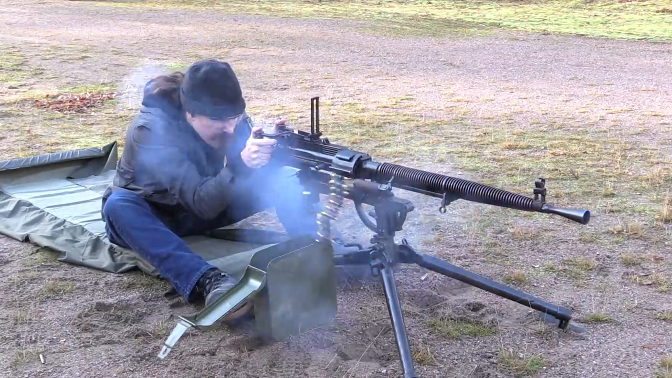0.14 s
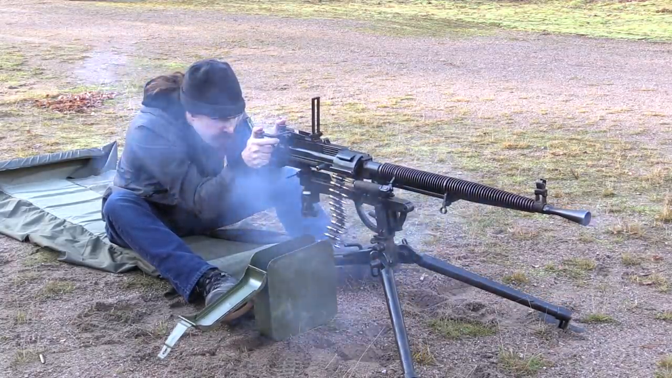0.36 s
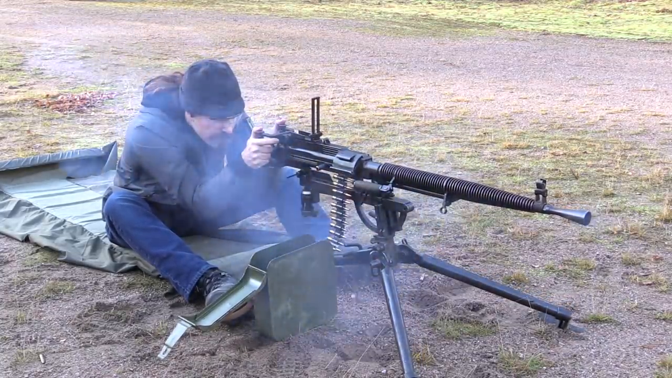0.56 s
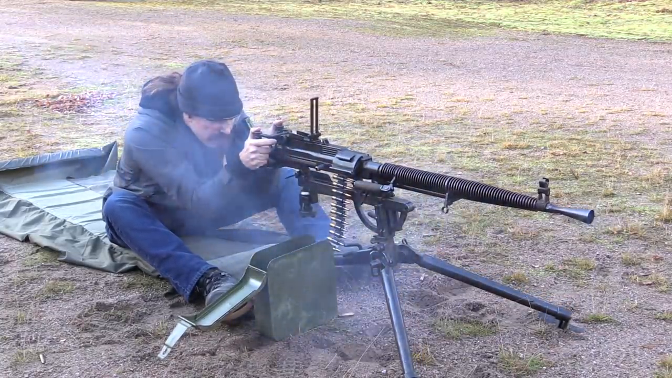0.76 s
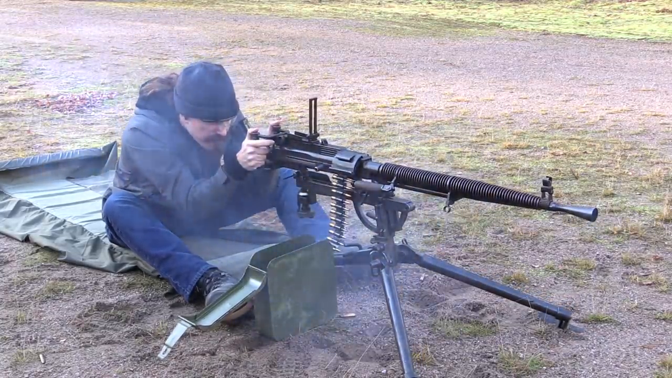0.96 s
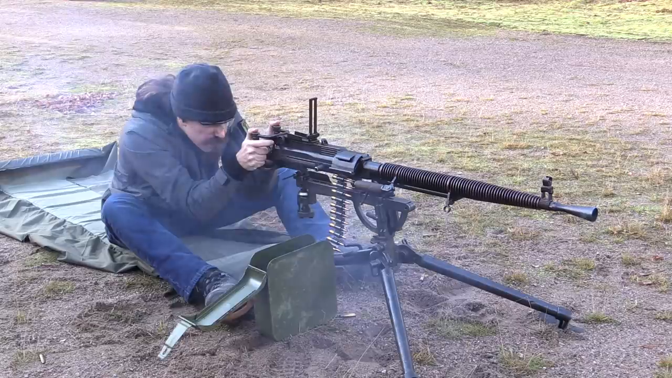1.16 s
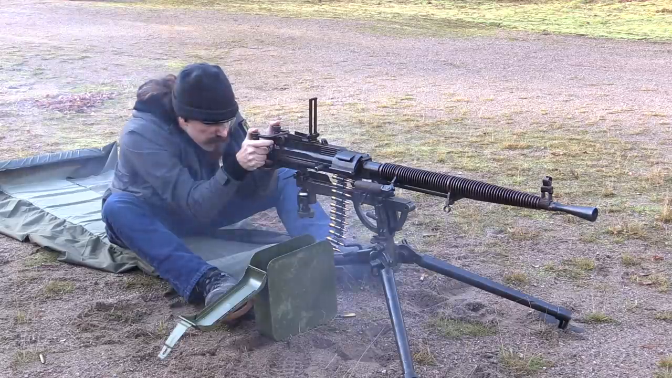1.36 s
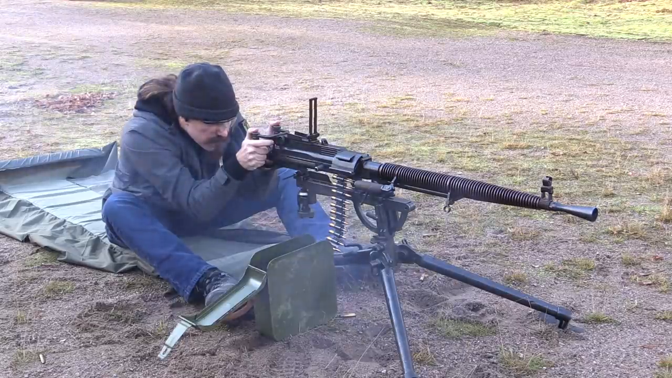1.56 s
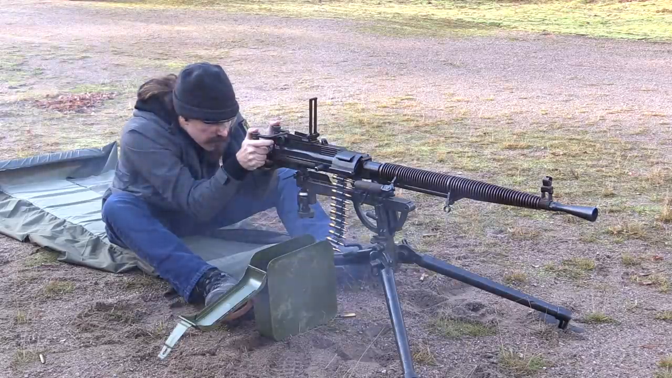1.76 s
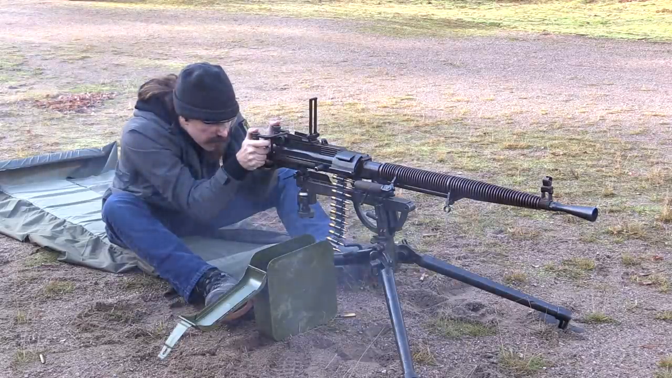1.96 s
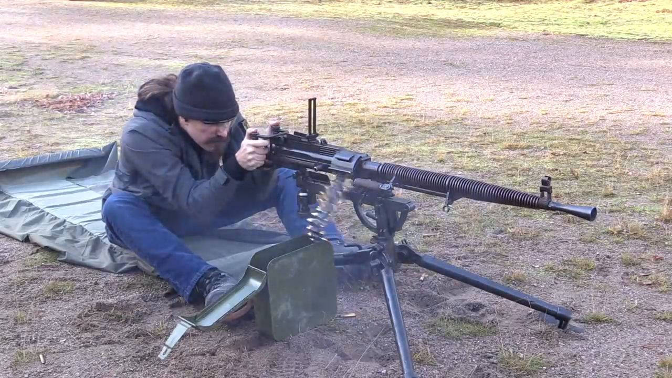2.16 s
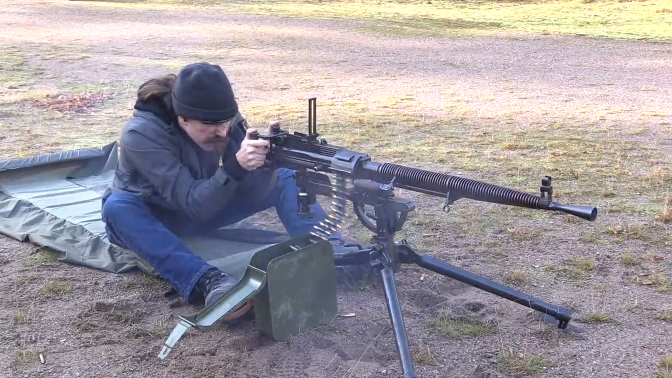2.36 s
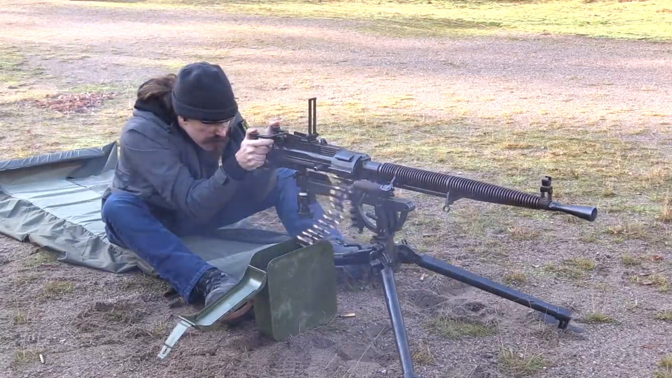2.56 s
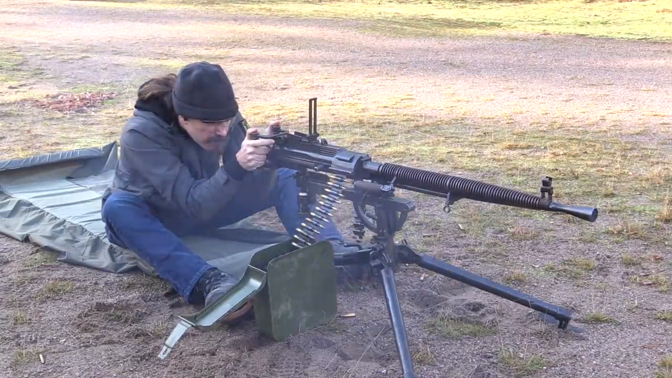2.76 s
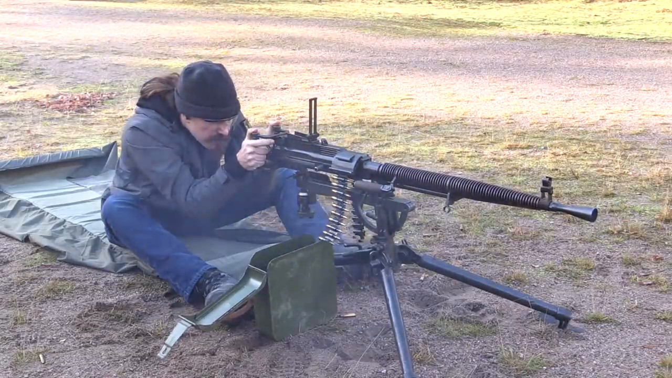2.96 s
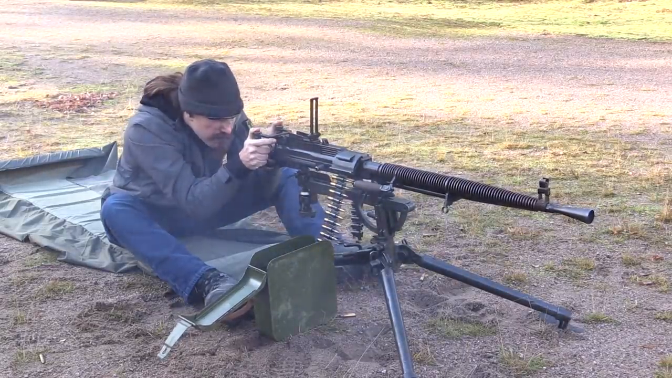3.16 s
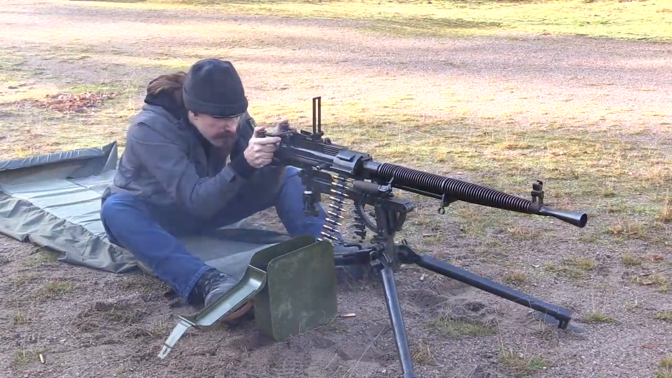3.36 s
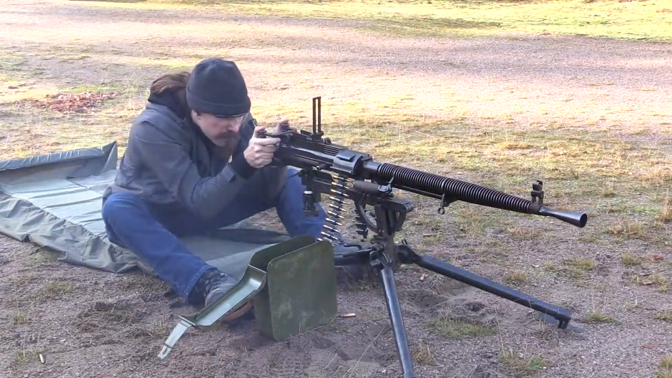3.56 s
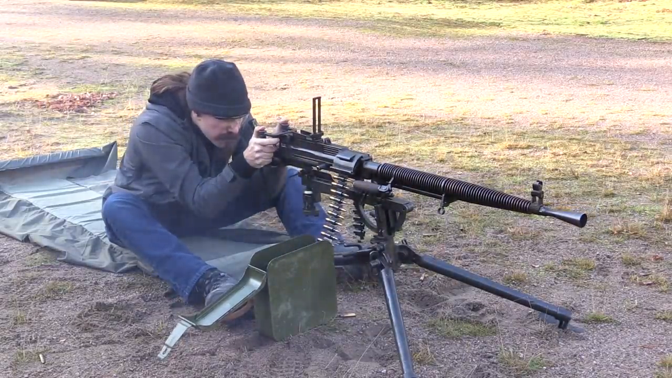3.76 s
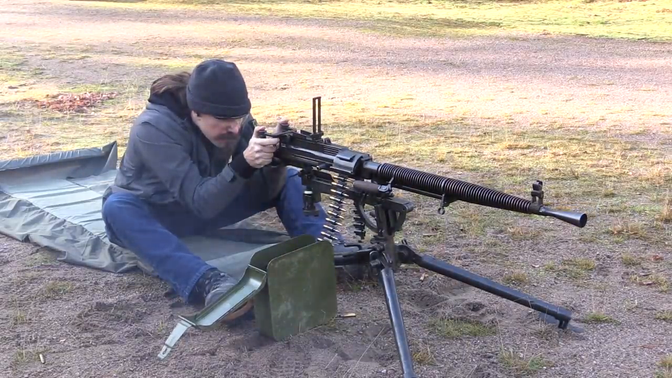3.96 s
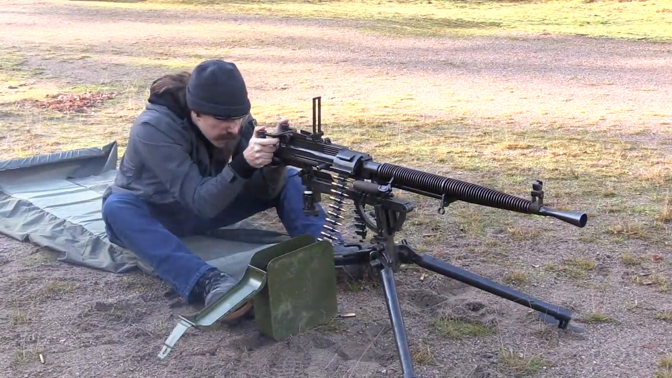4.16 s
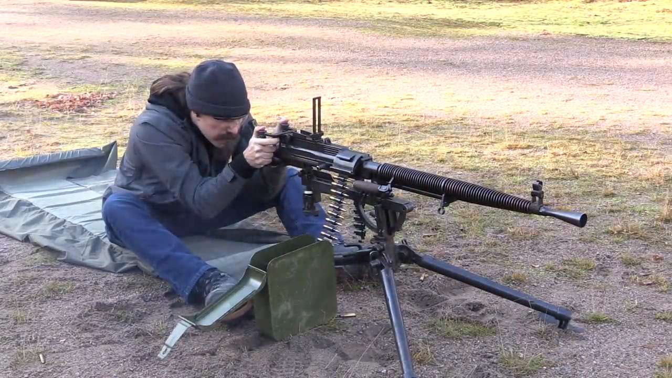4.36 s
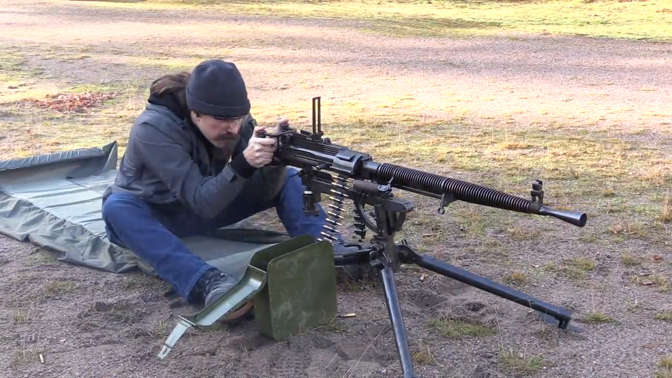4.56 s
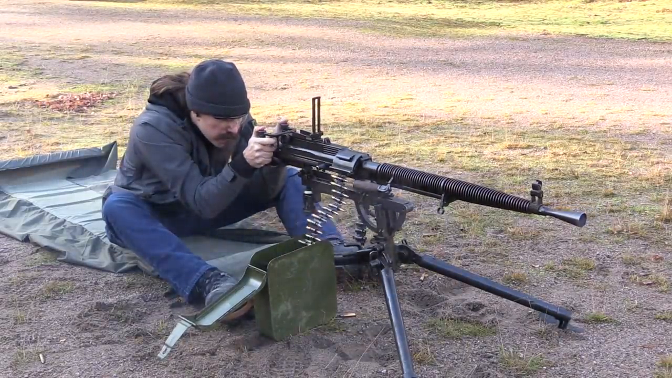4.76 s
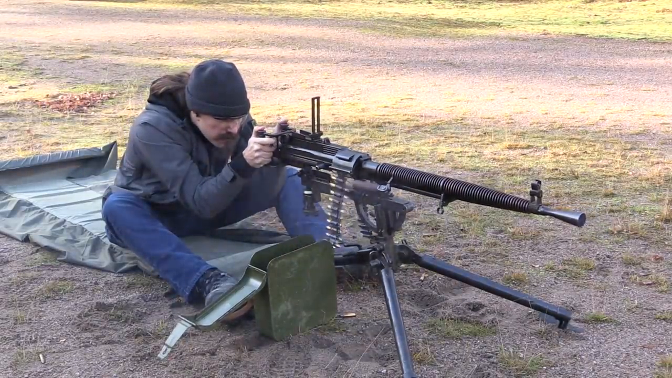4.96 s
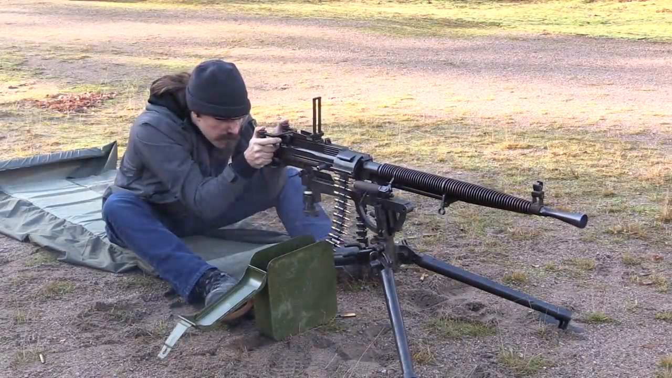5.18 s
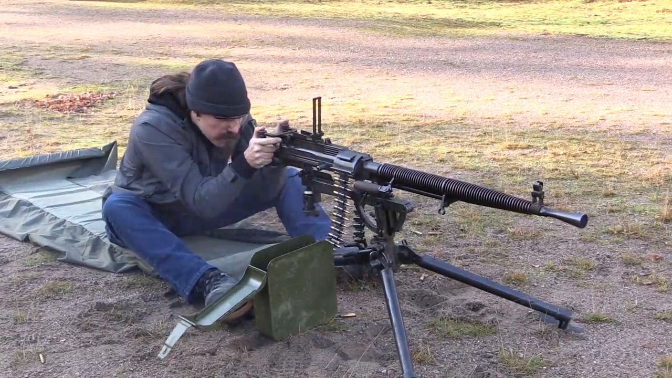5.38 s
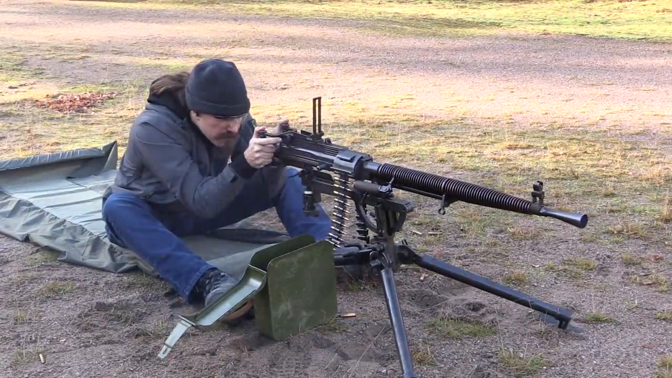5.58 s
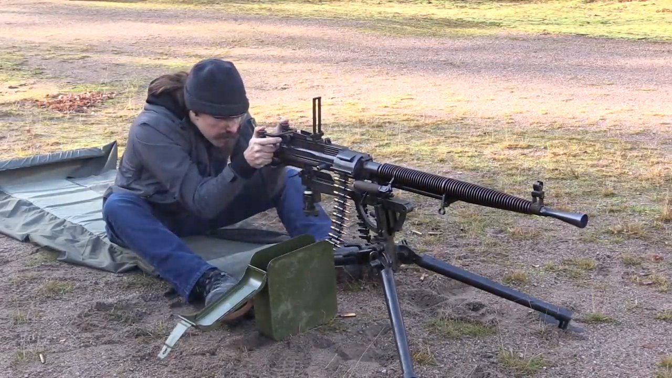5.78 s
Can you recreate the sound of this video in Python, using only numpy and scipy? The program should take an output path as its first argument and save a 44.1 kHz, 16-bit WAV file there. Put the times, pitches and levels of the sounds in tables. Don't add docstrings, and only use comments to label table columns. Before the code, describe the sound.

A nearby heavy machine gun fires three short, distorted bursts outdoors, each followed by thumping echoes, a rolling fading roar and tiny metallic clinks.

```python
import sys
import numpy as np
from scipy import signal
from scipy.io import wavfile

SR = 44100
rng = np.random.default_rng(int(sys.argv[2]) if len(sys.argv) > 2 else 0)


def wrap_up_sound(samples):
    columns = np.atleast_2d(samples).T
    tamed = np.clip(columns, -1, 1)
    steps = np.round(tamed * 32767).astype(np.int16)
    wavfile.write(sys.argv[1], SR, steps)


def decibels_to_gain(level_db):
    exponent = np.asarray(level_db, float) / 20
    return 10 ** exponent


N = 256645
TIME = np.arange(N) / SR
COARSE = TIME[::32]


def at_hz(points, hz):
    pitch_hz, level_db = np.array(points)[:, :2].T
    return np.interp(np.log(hz), np.log(pitch_hz), level_db)


def drift(rate_hz):
    r = np.exp(-64 * np.pi * rate_hz / SR)
    white = rng.standard_normal(len(COARSE) + 2000)
    slow = signal.lfilter([1], [1, -2 * r, r * r], white)[2000:]
    return slow / np.std(slow)


def noise_bank(gain_at):
    out = np.zeros(N)
    white = rng.standard_normal((2, N + 8000))
    edges = np.r_[np.geomspace(28, 2500, 20), np.geomspace(2500, 17000, 21)[1:]]
    for k, (low, high) in enumerate(zip(edges, edges[1:])):
        band_filter = signal.butter(4, [low, high], "band", fs=SR, output="sos")
        band = signal.sosfilt(band_filter, white[k % 2])[-N:]
        out += band * np.interp(TIME, COARSE, gain_at(np.sqrt(low * high)))
    return out * np.sqrt(SR / 2)


def ring(clicks, hz, t60):
    r, w = decibels_to_gain(-60 / (t60 * SR)), 2 * np.pi * hz / SR
    return signal.lfilter([0, np.sin(w)], [1, -2 * r * np.cos(w), r * r], clicks + 1e-18)


def strike(times, levels_db, modes, scatter_db):
    at = np.maximum(np.round(np.array(times) * SR), 0).astype(int)
    luck = rng.standard_normal((len(at), len(modes)))
    out = np.zeros(N)
    for k, (hz, level_db, t60) in enumerate(modes):
        clicks = np.zeros(N)
        np.add.at(clicks, at, decibels_to_gain(np.array(levels_db) + level_db + scatter_db * luck[:, k]))
        out += ring(clicks, hz, np.clip(t60, .01, 3))
    return out


def add(out, s, shape):
    a, b = np.clip([round((s - .06) * SR), round((s + .06) * SR)], 0, N)
    out[a:b] += shape(TIME[a:b] - s)


def puffs(events, decay_s, low_hz, top_hz):
    gate = np.zeros(N)
    for s, level_db in events:
        add(gate, s, lambda t: decibels_to_gain(level_db) * np.exp(-np.abs(t) / np.where(t > 0, decay_s, .3 * decay_s)))
    band = signal.butter(2, [low_hz, top_hz], "band", fs=SR, output="sos")
    return signal.sosfilt(band, 1.1 * gate * rng.standard_normal(N))


def stages(since, rows):
    power = 0
    for s, db, rise, fall in rows:
        ms = 1000 * (since - s)
        power = power + decibels_to_gain(db - np.maximum(-rise * ms, fall * ms)) ** 2
    return power


# pitch_hz, level_db (per Hz)
BREEZE = [(25, -82), (60, -90.5), (120, -103.5), (300, -100), (1000, -125), (16000, -150)]


def breeze(hz, gust_db):
    return decibels_to_gain(at_hz(BREEZE, hz) + 3 + gust_db) ** 2


# pitch_hz, level_db (per Hz)
HUSH = [(60, -104), (200, -89), (450, -83), (900, -89), (1900, -95), (3200, -110), (5500, -127),
        (9000, -140)]


def hush(hz):
    return decibels_to_gain(at_hz(HUSH, hz)) ** 2


# first_shot_s, last_shot_s, then banks_end_s and trees_end_s after the last shot, far_echo_db
BURSTS = [
    (-.2766, 0.16, .7, 1.0, 0.96),
    (2.077, 2.624, 0.627, .72, -1.2),
    (4.613, 4.941, .63, .82, 0.14),
]
# pitch_hz, near_fade_db_per_s, far_fade_db_per_s, far_below_near_db, drop_at_end_db
FADE = [(70, 31, 11.5, 14, 4.5), (170, 40, 14, 13.5, 10), (420, 48, 12, 14.5, 6.5),
        (950, 56, 13, 13.5, 5.5), (1900, 60, 20, 9.5, 8.5), (3320, 58, 23, 7.5, 6),
        (6000, 60, 19.5, 5.5, 7)]
# pitch_hz, level_db (per Hz)
FIRING_ROAR = [(250, -40.5), (900, -48.5), (1640, -46.5)]
# pitch_hz, level_db (per Hz)
ROAR_COLOUR = [(30, -31.5), (60, -22.5), (110, -7), (200, -1.4), (320, 2.74), (480, 3.5), (750, -2.2),
               (1100, -0.4), (1600, 3.5), (2500, -1.8), (4000, -4.5), (6000, -5), (10000, -1.5),
               (16000, -4)]


def roar(hz):
    near, far, below_db, drop_db = (at_hz([(row[0], row[k]) for row in FADE], hz) for k in range(1, 5))
    power = 0
    for first, last, banks_end, trees_end, far_db in BURSTS:
        end = trees_end + .83 * (trees_end - banks_end) * np.log2(min(hz, 2700) / 1900)
        end = banks_end if hz < 1130 else np.interp(hz, (3300, 5000, 8000), [end, .79, .64])
        built_db = np.interp(COARSE - first, [.02, .08], [-40, 0], left=-150)
        fading = np.maximum(COARSE - last - .12, 0)
        edge_s = .015 + 12 / hz
        dropped_db = drop_db * (1 + np.tanh((COARSE - last - end) / edge_s)) / 2
        echoes = decibels_to_gain(-near * fading) ** 2 + decibels_to_gain(far_db - below_db - far * fading) ** 2
        power = power + decibels_to_gain(built_db - dropped_db) ** 2 * echoes
    return power * decibels_to_gain(at_hz(FIRING_ROAR, hz) + at_hz(ROAR_COLOUR, hz)) ** 2


def air_absorption(hz, since_s):
    loss_db = 2 + 8.5 * since_s + 3 * since_s ** 2
    absorbed = (max(hz - 1900, 0) / 2750) ** 1.86
    return decibels_to_gain(-loss_db * absorbed) ** 2


# delay_s after the shot, level_db, pitch_hz, length_cycles, first_swing (1 up, -1 down)
BANKS = [(.3, -24, 300, 0.36, 0.29), (0.414, 0.5, 255.8, 0.23, -1), (0.4613, -3.5, 240.4, 0.48, 0.73),
         (0.472, -16.5, 177, 1.5, 1), (.5, -22.5, 380, 2.4, 0.76), (0.518, -6, 399, 0.55, 0.66),
         (0.6014, -7, 253, 0.57, 0.62), (.617, -18, 230.5, 0.77, 1), (0.687, -32.5, 233.5, 0.55, 1)]


def bank_echoes():
    out = np.zeros(N)
    for s, *shot in SHOTS:
        for delay, level_db, hz, cycles, swing in BANKS:
            add(out, s + delay + .001,
                lambda t: -swing * decibels_to_gain(level_db) * np.sin(2 * np.pi * hz * t) * np.exp(-(t * hz / cycles) ** 2))
    return out


# pitch_hz, level_db, t60_s
CASE = [(4800, -6, 0.3), (4600, -12, .25), (5300, -13, .2), (5620, -7, .12), (7500, -10.5, .08),
        (9570, -9, 0.12), (10260, -26, .09), (12300, -19, .05), (14800, -19, .05), (15500, -16, .06)]
# pitch_hz, level_db, t60_s
LINK = [(7450, -11, .07), (8170, -18, .04), (11300, -17.5, 0.037), (12400, -15, .04), (13560, -2, .12),
        (15200, -14, .04)]
# start_s, case_db, link_db, tick_db
DROPS = [(0.413, -72, -45, -41), (.563, -83, -46, -30.5), (.69, -72, -62, -62), (0.728, -75, -48, -61),
         (2.805, -50, -53, -19.5), (2.822, -50, -50, -21), (2.88, -60, -46, -44), (2.945, -60, -59, -39),
         (3.025, -60, -62, -42.5), (3.082, -61, -41.5, -47), (3.097, -21.5, -40.5, -30),
         (3.3, -74.5, -68, -82), (3.645, -88, -82.5, -62.5), (3.658, -76, -55, -58),
         (3.788, -94.5, -80, -60), (5.163, -70, -42.5, -60.5), (5.278, -73, -53, -59.5),
         (5.326, -70, -39, -39), (5.344, -77, -47, -70)]


def falling_cases_and_links():
    s, case_db, link_db, tick_db = np.transpose(DROPS)
    cases = strike(s, case_db, CASE, scatter_db=1.5)
    links = strike(s, link_db, LINK, scatter_db=3)
    return cases + links + puffs(zip(s, tick_db), .0015, low_hz=8920, top_hz=14700)


BOLT_CLOSES = [.256, 2.716, 5.025]
# pitch_hz, t60_s, then after_first_db, after_second_db, after_third_db
STEEL = [(9114, 1.24, -32.5, -36, -42), (9475, 1.7, -62.5, -54, -69), (9771, 2.2, -65.5, -66, -64),
         (9997, 2.3, -73, -59.5, -58), (10120, 1.4, -41.5, -60.5, -59.5), (10310, 2.4, -66.5, -67, -61),
         (10440, 1.2, -76.5, -66.5, -54), (10800, 0.8, -73, -71.5, -35.5), (10860, 1.1, -79, -75, -37),
         (11450, 1.3, -83, -68, -76), (12210, 1.6, -73.5, -80, -62), (12950, 2.6, -74.5, -80, -72),
         (13700, 2.2, -73, -72, -70), (14230, 2.2, -78, -75, -68)]


def ringing_steel():
    out = np.zeros(N)
    for hz, t60, *levels_db in STEEL:
        clicks = np.zeros(N)
        clicks[np.round(np.array(BOLT_CLOSES) * SR).astype(int)] = decibels_to_gain(np.array(levels_db))
        flutter = decibels_to_gain(3.5 * (hz > 9300) * (drift(14) - .3))
        out += ring(clicks, hz, t60) * np.interp(TIME, COARSE, flutter)
    return out


# start_s, peak_db
BOLT_KNOCKS = [(2.0395, -9.5), (2.06, -20), (2.0685, -14), (4.574, -10.5), (4.585, -18)]


def bolt_knocks():
    return puffs(BOLT_KNOCKS, .0012, low_hz=1300, top_hz=9500)


# release_s, jerk_db, feed_catch_db, arrival_s, arrival_db
BOLT_RUN = [
    (2.0145, -22, -19.5, 2.075, -16),
    (4.555, -25, -22.5, 4.612, -13.5),
]


def bolt_run():
    power = 0
    scrape = .55
    for s, jerk_db, catch_db, home, home_db in BOLT_RUN:
        run = stages(COARSE, [(s, jerk_db, 8, scrape), (home, home_db, .7, 8)])
        catch = stages(COARSE, [(s + .031, catch_db, scrape, scrape)])
        power = power + run * (COARSE > s - .015) + catch * (COARSE > s)
    return power


# pitch_hz, level_db, t60_s
RECEIVER = [(500, 0, .07), (610, -5, .05), (1700, -4, .04)]


def recoil():
    times = [s + .038 for s, *shot in SHOTS if s > 0]
    return strike(times, np.full(len(times), -8), RECEIVER, scatter_db=2.5)


def since_last_shot():
    return np.min([np.where(COARSE >= s, COARSE - s, 9) for s, *shot in SHOTS], axis=0)


def pressure_wave():
    out = np.zeros(N)
    for s, db, push, lag in SHOTS:
        held = lambda t: (np.tanh((t + .013) / .002) - np.tanh(t / .0003)) / 2
        jolt = lambda t: .2 * (t > 0) * np.exp(-np.abs(t) / .004)
        add(out, s + .021, lambda t: np.minimum(push, 1) * (held(t) / 2 - jolt(t)))
    return out


# start_s, blast_db, pressure_push (0 to 1), hiss_lag_s
SHOTS = [(-.2766, 4, .7, .008), (-.1641, 6, 0.58, .008), (-.0509, -4, 0.44, -0.052), (0.0547, 0, 0.76, .01),
         (0.1622, 1, .7, 0.017), (2.08, 5, .9, 0.0091), (2.192, 1, 0.99, -0.005), (2.2962, -1.5, .9, -.001),
         (2.4046, -0.5, .9, .004), (2.5109, 3.5, 0.96, 0.015), (2.625, 2.5, 0.33, 0.0069),
         (4.615, 2.5, 0.59, 0.011), (4.7232, 1.5, 0.42, .001), (4.8344, 1.5, .8, .001),
         (4.938, 2.5, 0.95, .001)]
# peak_s after the shot, level_db, rise_db_per_ms, fall_db_per_ms
HISS_STAGES = [
    (0, -3, 1.64, 1.07),
    (.032, -14.5, 0.5, 1.1),
    (.07, -29, 0.6, 0.2),
    (.09, -15.5, 1, 1.2),
]
# peak_s after the shot, level_db, rise_db_per_ms, fall_db_per_ms
BOOM_STAGES = [
    (.008, -11, 2.5, 0.2),
    (.032, -2, 1.0, .9),
    (.08, -8.5, 1.5, 1.1),
    (.11, -13, 0.4, 0.1),
]
# pitch_hz, level_db (per Hz)
HISS = [(500, -31.5), (1000, -10), (2000, 5.5), (4000, 5), (8000, -1), (12000, -11), (16000, -18)]
# pitch_hz, level_db (per Hz)
BOOM = [(40, -32), (120, 1.5), (250, -7.5), (450, 4.5), (750, -4.5), (1600, -3.5), (3000, -14), (6000, -36)]
# pitch_hz, level_db (per Hz)
BOLT_COLOUR = [(120, -80), (200, -46), (647, -39), (1050, -5), (1600, 0), (2290, -2.5), (4640, -4.5),
               (5170, -12), (7280, -10), (15000, -26)]


def gunfire():
    hiss = sum(decibels_to_gain(db) ** 2 * stages(COARSE - s - lag, HISS_STAGES) for s, db, push, lag in SHOTS)
    boom = sum(decibels_to_gain(db) ** 2 * stages(COARSE - s, BOOM_STAGES) for s, db, push, lag in SHOTS)
    bolt = bolt_run()
    since_s = since_last_shot()
    lull = decibels_to_gain(-5 * np.exp(-((since_s - .058) / .007) ** 2))
    together, gust_db = drift(6.6), 3 * drift(2.4)

    def gain_at(hz):
        echoes = roar(hz) * air_absorption(hz, since_s) + hush(hz)
        power = echoes * decibels_to_gain(.82 * together + 1.2 * drift(21)) ** 2
        power = power + breeze(hz, gust_db)
        power = power + bolt * decibels_to_gain(at_hz(BOLT_COLOUR, hz) - 37.5) ** 2
        power = power + hiss * decibels_to_gain(at_hz(HISS, hz) - 40.5) ** 2
        power = power + boom * decibels_to_gain(at_hz(BOOM, hz) - 30.5) ** 2
        return np.sqrt(power) * lull
    return noise_bank(gain_at)


def scene():
    metal = falling_cases_and_links() + ringing_steel() + bolt_knocks() + recoil()
    return (bank_echoes() + metal + pressure_wave() + gunfire())[None]


def band_limit(x):
    return signal.sosfilt(signal.butter(12, 15700, fs=SR, output="sos"), x)


def record(dry):
    clipped = dry / (1 + np.abs(dry / .23) ** 9.0) ** (1 / 10.5)
    drooped = signal.lfilter(*signal.butter(1, 140, "high", fs=SR), clipped)
    cut = signal.sosfilt(signal.butter(2, 92.5, "high", fs=SR, output="sos"), drooped)
    cut = signal.sosfilt(signal.cheby2(12, 60, 16400, fs=SR, output="sos"), cut)
    mix = cut / (1 + np.abs(cut / .55) ** 8) ** (1 / 8)
    return band_limit(mix)


dry = scene()
out = record(dry)
wrap_up_sound(out)
```